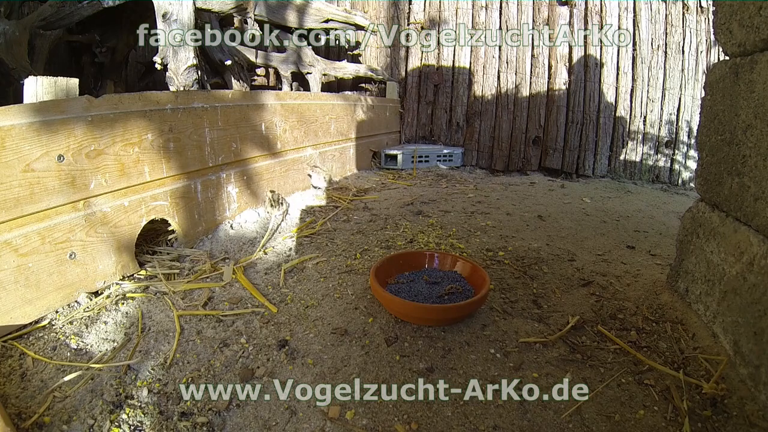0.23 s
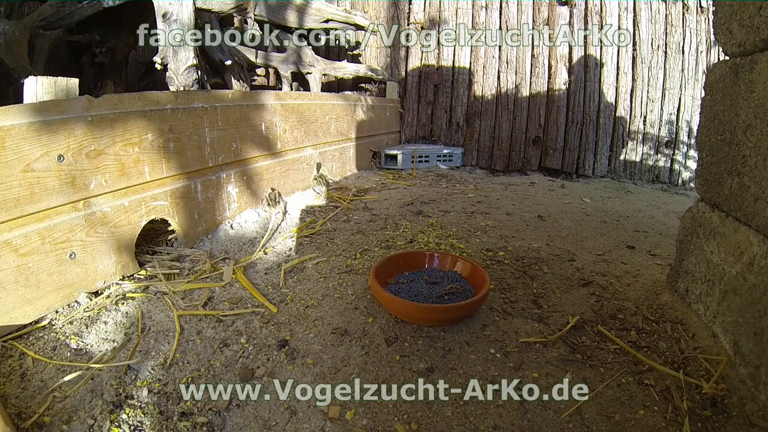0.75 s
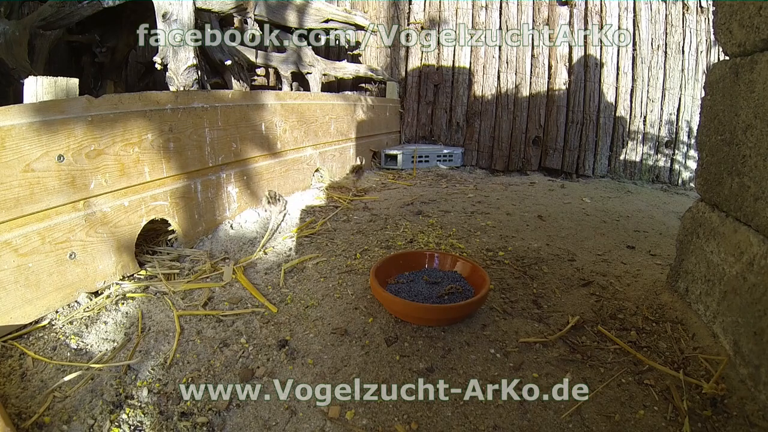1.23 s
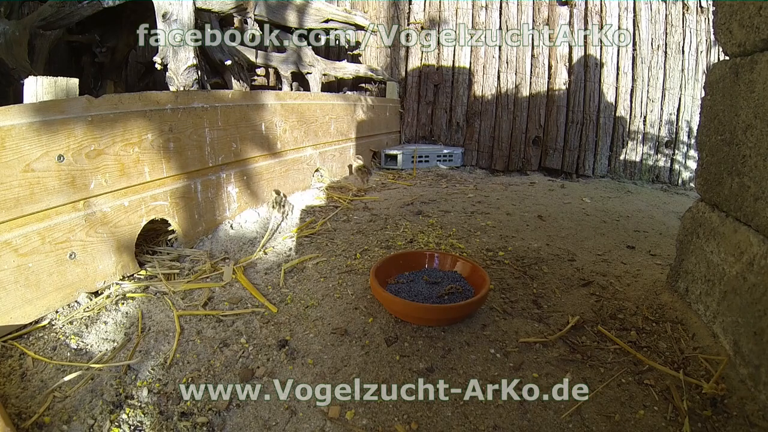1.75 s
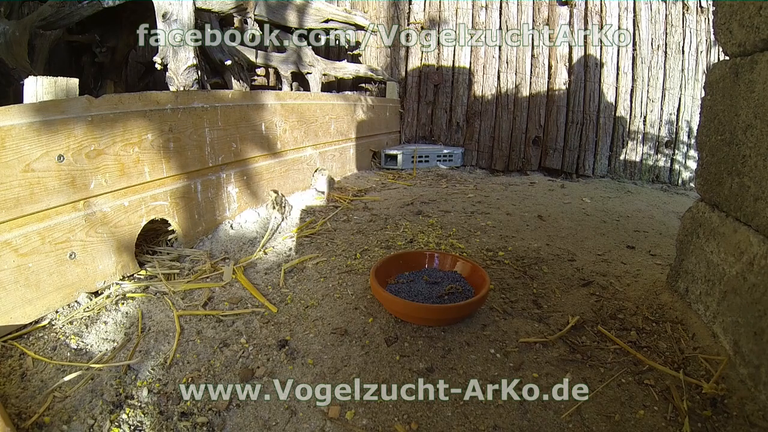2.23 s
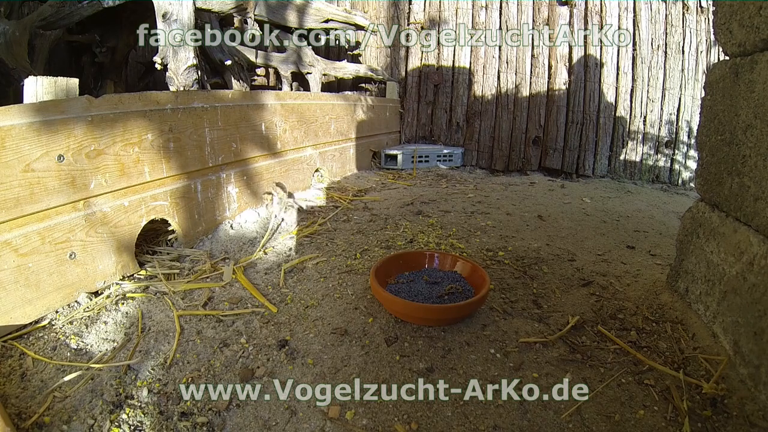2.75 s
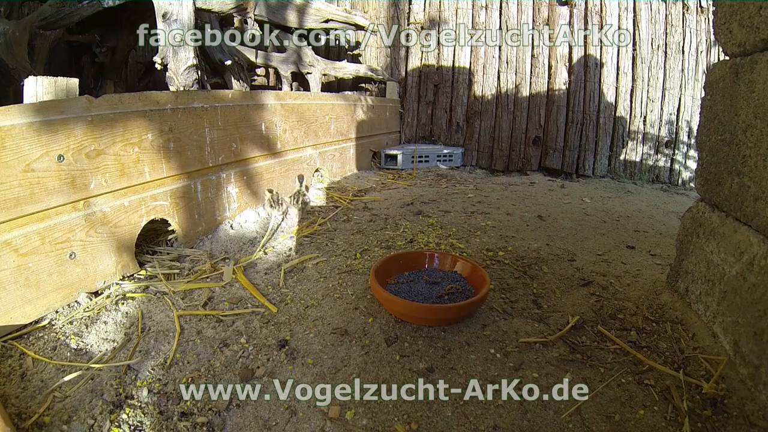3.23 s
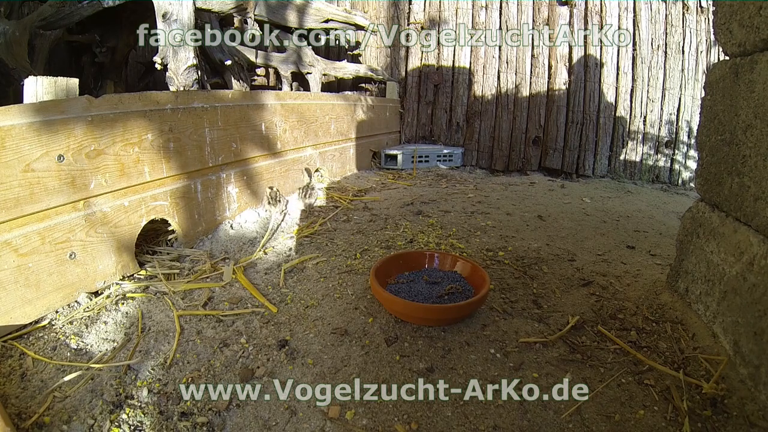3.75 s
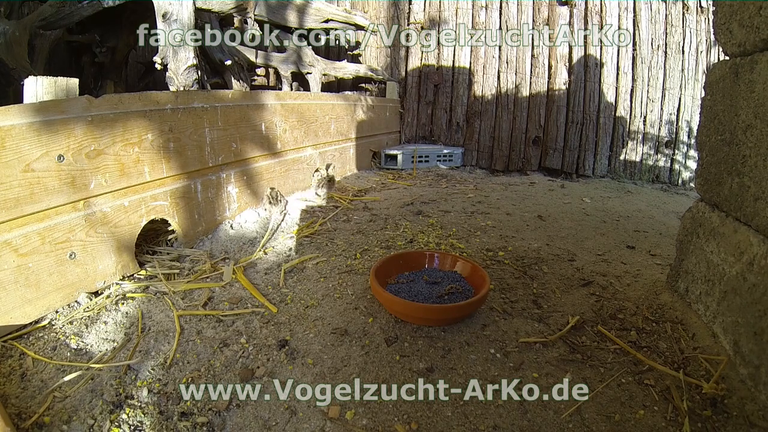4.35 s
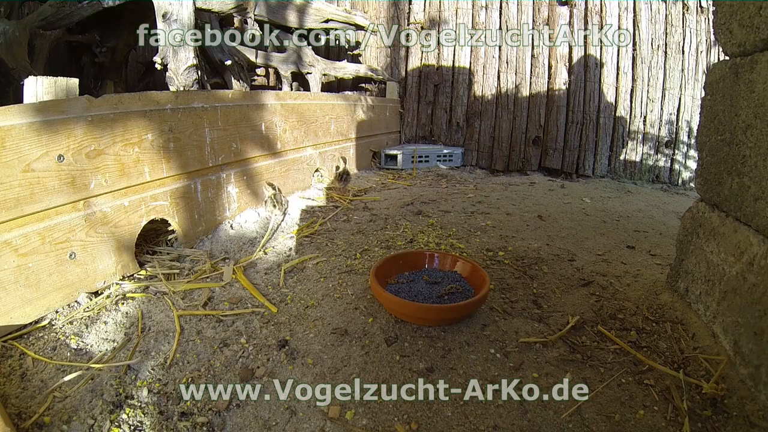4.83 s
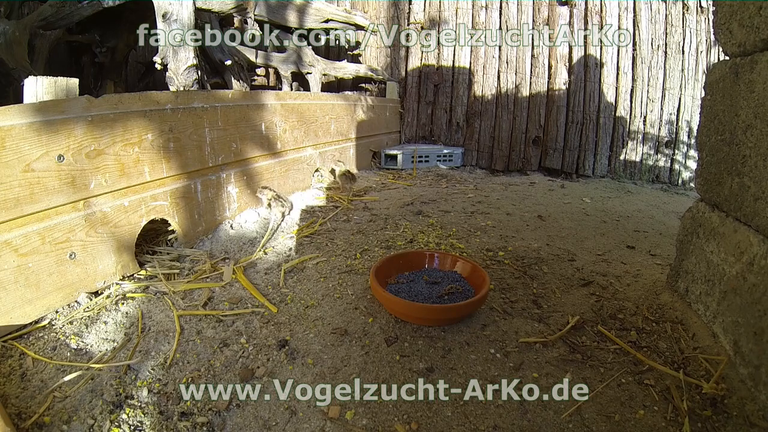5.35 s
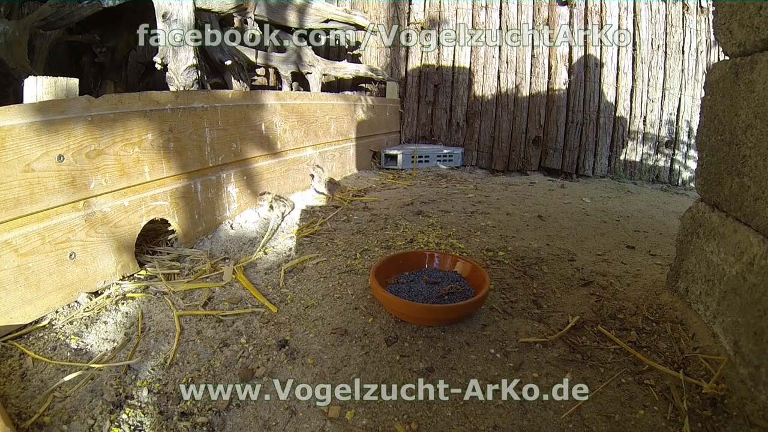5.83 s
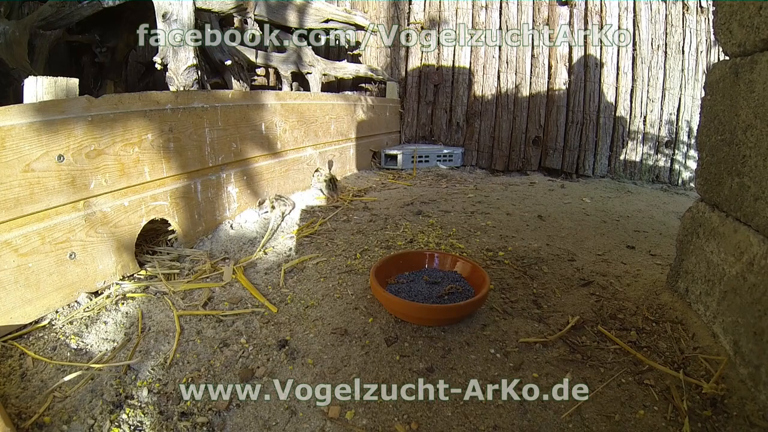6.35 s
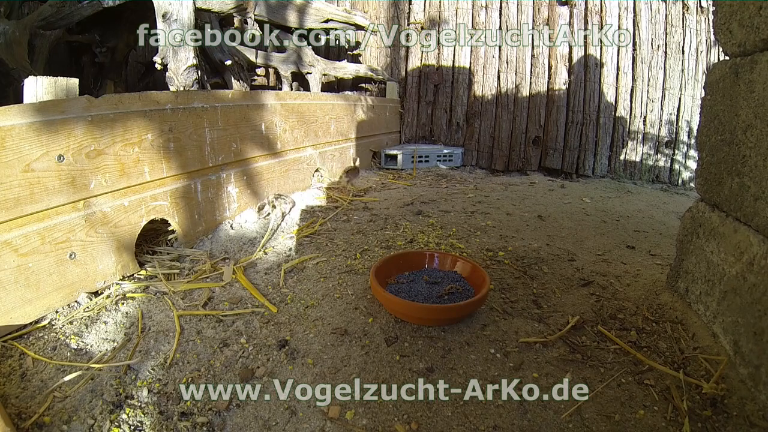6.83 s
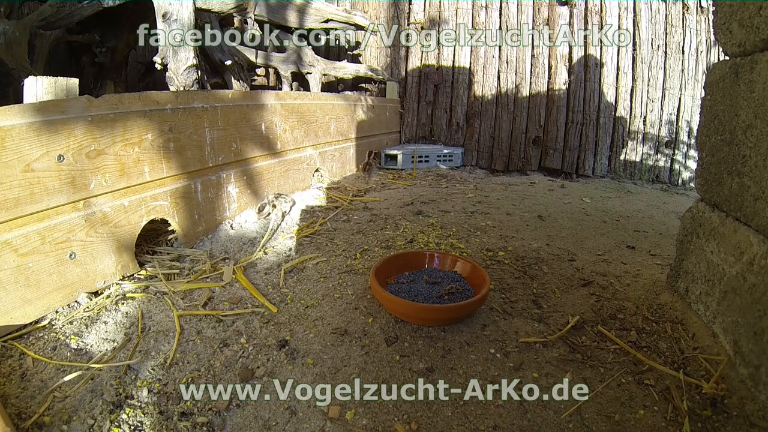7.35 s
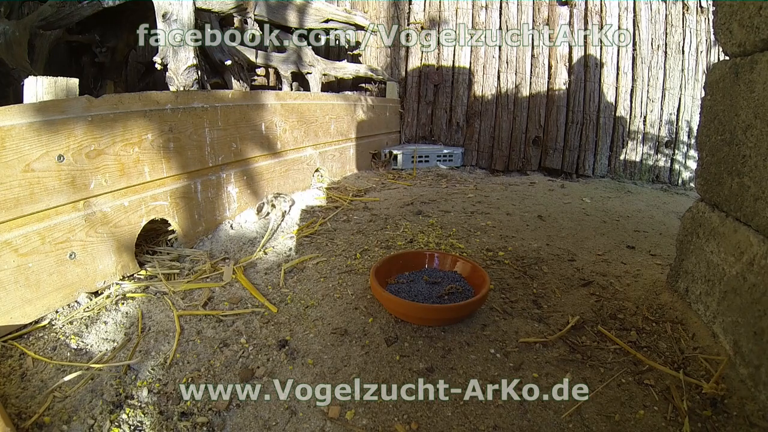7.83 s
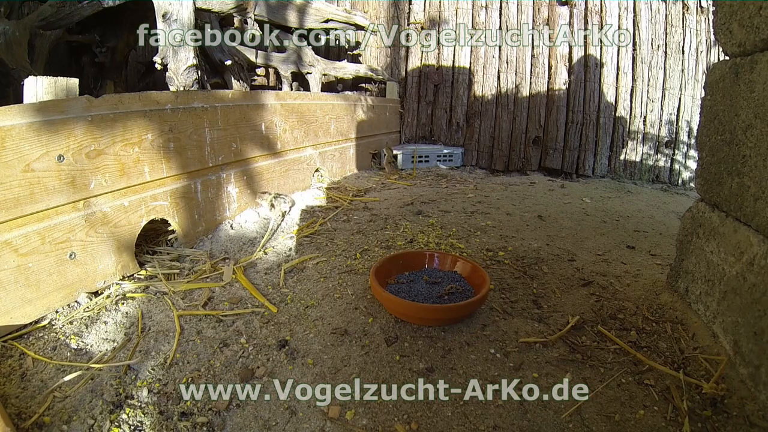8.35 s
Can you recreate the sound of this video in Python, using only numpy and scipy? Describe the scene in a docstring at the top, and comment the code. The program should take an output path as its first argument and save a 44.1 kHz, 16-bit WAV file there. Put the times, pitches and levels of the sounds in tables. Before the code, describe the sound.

Quail call in an outdoor wooden pen. Faint thin whistles and peeps come first, then one loud call that sweeps up, dips and flicks up again. A quick run of chirrups leads into two more sharp calls, followed by a brief soft whine from a larger fowl and faint scratches in straw. The nearby boards add short echoes, while a low rumble and a far passing engine lie underneath.

```python
"""Quail in a wooden pen

Three loud calls sweep up, dip and flick up again among soft chirrups, peeps, thin whistles and yelps,
each an unsteady syrinx tone with overtones coloured by the beak. A larger fowl whines once, and the
boards answer these voices with short echoes. Two soft, breathy bird notes sit among scratches of feet
in the straw; a soft hiss comes twice, over a low outdoor rumble and a far passing engine."""
import sys
import numpy as np
from scipy import signal
from scipy.fft import rfft, irfft, next_fast_len
from scipy.io import wavfile
from scipy.ndimage import uniform_filter1d, map_coordinates

SR = 44100
rng = np.random.default_rng(int(sys.argv[2]) if len(sys.argv) > 2 else 0)


def generate_wav(sig):
    """Save sig (samples, or channels by samples) to the path in sys.argv[1] as 16-bit PCM at SR."""
    pcm = np.round(np.clip(np.atleast_2d(sig).T, -1, 1) * 32767).astype(np.int16)
    wavfile.write(sys.argv[1], SR, pcm)


N = 378819
TIME = np.arange(N) / SR

# low end of the outdoor bed: freq_hz, density_db
RUMBLE_SPECTRUM = [(11, -27.5), (18, 2), (27, 0.5), (38, 3.5), (46, -4), (59, -11.5), (96, -5.5), (145, -7),
                   (157, -11.5), (174, -17.5), (209, -11), (223, -14), (247, -23), (313, -19.5),
                   (400, -28.5), (520, -53.5), (880, -120)]
# open air: freq_hz, density_db
AIR_SPECTRUM = [(180, -26.5), (300, -0.5), (452, -8), (490, -7.5), (841, -10.5), (975, -7), (1170, -15.5),
                (1350, -14.5), (3120, -30), (4180, -30.5), (4850, -32), (5260, -33.5), (7420, -41),
                (13200, -39), (15000, -50)]
# narrow high hiss on top of the bed: freq_hz, density_db
SHEEN_SPECTRUM = [(9000, -40), (9700, -19), (10000, 11.5), (10300, -7.5), (11000, -39)]
# the engine's dull roar: freq_hz, density_db
ROAR_SPECTRUM = [(90, -23.5), (135, 1.5), (155, 1.5), (175, -13), (205, -15), (260, -32.5), (500, -71.5)]
# swells in the engine's drone: start_s, length_s, boost_db
DRONE_SWELLS = [(5.263, 0.99, 8), (6.499, 0.7963, 4)]
# soft stretches of hiss: start_s, length_s, level_db
HISSES = [(1.341, 0.41925, -58.5), (3.956, 0.337, -55.5)]
# their colour: freq_hz, density_db
HISS_SPECTRUM = [(500, -20), (1200, 2.5), (2200, -1.5), (4000, -6), (5100, -13), (5800, -20), (9000, -49)]
# their faint ring: centre_hz, width_hz, gain_db
HISS_MODES = [(3650, 120, 0), (4053.6, 88, 1.5), (4750, 150, -6), (5002.3, 120, 0)]
# straw scratches, and two soft, breathy bird notes near 3.2 kHz (at 7.104 and 7.133 s):
# start_s, length_s, level_db, centre_hz, width_ratio
SCRATCHES_AND_NOTES = [(5.578, 0.01898, -64, 3940, .34), (6.64, 0.024, -64, 7900, .83),
                       (6.715, .0058, -55, 12090, .77), (6.716, 0.013182, -54, 2003, 2.2725),
                       (6.98, .21, -69.5, 7900, 2), (7.104, .029, -57, 3150, .19),
                       (7.133, 0.041, -57, 3340, 0.21), (7.257, .016, -63.5, 4330, 0.782)]

# slaps off the boards: delay_s, gain_db
BOARD_ECHOES = [(.0031, -20.5), (.0074, -5), (0.012, -18), (.019, -10)]
# decay of the scatter in the pen: freq_hz, t60_s
PEN_DECAY = [(300, 0.28), (2000, 0.22), (2800, 0.15), (5000, 0.22), (12000, 0.13)]
# how the beak radiates overtones: freq_hz, gain_db
BEAK_EQ = [(1000, 1), (4200, 2), (5000, 1), (5500, -13.5), (6000, -12), (6600, -13.5), (7600, -12.5),
           (8400, -14.5), (9300, -19), (12000, -15), (15000, -20)]
# overtones of the whine and the yelps: harmonic, gain_db
FOWL_PARTIALS = [(2, -3.5), (3, -21.5), (4, -34)]
# overtones of whistles, peeps and chirrups: harmonic, gain_db
THIN_PARTIALS = [(2, -5), (3, -31)]
# overtones of the loud calls: harmonic, gain_db
QUAIL_PARTIALS = [(2, -2.5), (3, -13), (4, -19), (5, -24.5), (6, -29)]
# air rushing through the beak: freq_hz, density_db
RUSH_SPECTRUM = [(3000, -9.5), (5500, 8), (7000, -10.5), (9500, -5), (10800, 3.5), (11800, -4.5),
                 (12800, -2), (15000, -10.5)]

# contour of the fowl's whine: time_s, pitch_hz, contour_db
WHINE_CONTOUR = [(6.66, 495.7, -47), (6.714, 520.4, -45), (6.728, 366.5, -41), (6.75, 396, -40),
                 (6.788, 494, -45.5), (6.83, 568, -41), (6.838, 664, -47.5), (6.86, 664.8, -42),
                 (6.87, 796, -38), (6.89, 743, -46)]
# thin rising whistles: start_s, length_s, start_hz, top_hz, level_db, overtones_db, second_voice_db
WHISTLES = [(0, 0.38, 2714, 3140, -60, 17, -53.5), (4.131, 0.44, 2620, 3260, -60, 16, -64),
            (6.162, .42, 2700, 3280, -61, 15, -57), (7.911, .49, 2614, 3170, -59.5, 14.5, -55.5)]
# arched peeps: start_s, length_s, crest_hz, end_drop_ratio, level_db
PEEPS = [(0.084, 0.09, 4760, 0.11, -62), (3.902, 0.04587, 4150, 0.21, -63),
         (5.026, 0.069, 4126, 0.25, -52.5), (5.458, 0.053, 4760, 0.18, -60.5),
         (5.742, 0.0718, 5018, 0.067, -70), (5.858, 0.059, 4850, 0.24, -63),
         (6.014, .082, 4943, 0.0906, -67), (7.377, 0.052, 4802, .22, -64), (7.449, .067, 4311, .07, -61.5),
         (7.591, 0.09, 4452, .04, -56.5), (7.875, 0.057, 4870, 0.2, -66), (8.04, .047, 4576, .1, -65)]
# quick downward slurs: start_s, length_s, end_hz, level_db
SLURS = [(2.135, 0.039, 4424, -70), (2.384, 0.033, 4290, -54.5), (2.964, 0.03542, 3860, -61),
         (7.793, 0.013, 3150, -57), (8.417, 0.016, 3320, -49.5)]
# quick yelps: crest_s, level_db
YELPS = [(.862, -43), (4.911, -39.5)]
# runs of chirrups: first_crest_s, last_crest_s, first_hz, last_hz, level_db, dip_ratio
CHIRRUP_RUNS = [(0.375, 0.893, 4570, 4507, -53, .25), (4.072, 4.876, 4186, 4416, -44.5, .2)]
# the lead calls: start_s, attack_s, rise_s, hold_s, dip_s, start_hz, dip_hz, level_db,
# loss_db_per_oct (below the crest), overtones_db, high_overtones_db, flutter_hz, flutter_db,
# beak_ring_hz, beak_ring_db, rush_db
LOUD_CALLS = [(2.583, 0.025, .11, 0.059, 0.084463, 1352, 2259, -21, 19.5, -18.5, 1, 66.14, 4.5, 14300, -2, -43),
              (5.079, 0.0083, .138, .006, 0.078, 1518, 1865, -27.5, 11, -12.5, -9.5, 124.3, 2.5, 10760, 3.5, -25),
              (6.309, 0.057, .15, .022, .078, 1377, 2078, -27.5, 11.5, -12.5, -1, 106.2, 2.5, 12500, -2, -37)]

CREST_HZ, CREEP_OCT = 2896, .18  # a loud call's top pitch; the slow last part of its climb
DIP_SQUARENESS, STUTTER_HZ, STUTTER_OCT = 2.1, 55.07, .096  # the dip's flat bottom and its stutter
FLICK_S, FLICK_OCT, RELEASE_S = .012, .06, .012  # closing flick: length, drop below the crest, fade
RICHER_DB_PER_OCT = 15.5  # overtones grow below the crest
THROAT_HZ, THROAT_WIDTH_HZ, THROAT_DB = 3447.6, 130, 6.5  # they flare as the octave crosses this mode


def amp(db):
    """Decibels to gain."""
    return 10 ** (np.asarray(db) / 20)


def unit(x):
    """Scale to rms 1."""
    return x / np.sqrt(np.mean(x ** 2) + 1e-20)


def along(points, hz):
    """Read (freq_hz, value) points on a log frequency axis."""
    freqs, values = np.transpose(points)
    return np.interp(np.log(hz + 1), np.log(freqs + 1), values)


def curves(rows):
    """One value per sample for each column, from the first row's time to the last."""
    times, *columns = np.transpose(rows)
    return [np.interp(np.arange(times[0], times[-1], 1 / SR), times, column) for column in columns]


def wobble(rate, size):
    """A smooth random curve, rate knots a second."""
    knots = rng.standard_normal(int(size * rate / SR) + 4)
    return map_coordinates(knots, [np.arange(size) * rate / SR])


def ease(u):
    """A smooth step from 0 to 1 as u goes from 0 to 1."""
    return np.sin(np.pi / 2 * np.clip(u, 0, 1)) ** 2


def fade(size, edge_s):
    """A gate that opens and closes softly."""
    t = np.arange(size) / SR
    return ease(np.minimum(t, t[-1] - t) / edge_s)


def filtered(x, response):
    """Shape x with a frequency response."""
    padded = next_fast_len(len(x) + 8192)
    return irfft(rfft(x, padded) * response(np.fft.rfftfreq(padded, 1 / SR)), padded)[:len(x)]


def resonance(f, hz, width_hz):
    """Causal response of one mode, 1 at its peak."""
    return 1j * f * width_hz / (hz * hz - f * f + 1j * f * width_hz)


def noise(spectrum, size):
    """Coloured noise of rms 1."""
    return unit(filtered(rng.standard_normal(size), lambda hz: amp(along(spectrum, hz))))


def add(track, start_s, sound):
    """Mix a sound into the track."""
    start = max(round(start_s * SR), 0)
    track[start:start + len(sound)] += sound[:N - start]


def outdoors():
    """The bed: low rumble, even air and a narrow high hiss."""
    rumble = amp(-35.5 + .23 * wobble(6.7, N)) * noise(RUMBLE_SPECTRUM, N)
    air = amp(-52 + .057 * wobble(5.8, N)) * noise(AIR_SPECTRUM, N)
    sheen = amp(-82.5) * noise(SHEEN_SPECTRUM, N)
    return rumble + air + sheen


def engine(pitch_hz=87.873, doppler_hz=20, nearest_s=4.9, pass_s=2.6, roar_peak_s=3.98, roar_width_s=1.2):
    """A far engine passes: Doppler shift sinks its drone, and its dull roar comes and goes."""
    away = (TIME - nearest_s) / pass_s
    hz = (pitch_hz - doppler_hz * np.tanh(away)) * (1 + .0199 * wobble(14, N))
    swell_db = sum(db * ease(np.minimum(TIME - start_s, start_s + length_s - TIME) / .12)
                   for start_s, length_s, db in DRONE_SWELLS)
    drone_db = -42 - 3 * away ** 2 + swell_db + 1.44 * wobble(15, N)
    drone = np.sqrt(2) * amp(drone_db) * np.sin(2 * np.pi * np.cumsum(hz) / SR)
    roar = amp(-42.5) / np.hypot(1, (TIME - roar_peak_s) / roar_width_s) * noise(ROAR_SPECTRUM, N)
    return drone + roar


def hiss():
    """Two soft stretches of hiss with a faint ring."""
    out = np.zeros(N)
    ring = lambda f: 1 + sum(amp(db) * resonance(f, hz, width_hz) for hz, width_hz, db in HISS_MODES)
    for start_s, length_s, level_db in HISSES:
        size = int(length_s * SR)
        ringing = filtered(noise(HISS_SPECTRUM, size), ring)
        add(out, start_s, amp(level_db) * unit(ringing) * fade(size, edge_s=.01748))
    return out


def straw_and_breathy_notes():
    """Gritty band-passed noise: wide bands are straw scratches, the two narrowest are soft bird notes."""
    out = np.zeros(N)
    for start_s, length_s, level_db, hz, width_ratio in SCRATCHES_AND_NOTES:
        size = int(length_s * SR)
        grit = rng.standard_normal(size) * amp(5.3 * wobble(900, size))
        grit = filtered(grit, lambda f: resonance(f, hz, hz * width_ratio) ** 2)
        add(out, start_s, amp(level_db) * unit(grit) * fade(size, edge_s=.0019))
    return out


def pen(x, boards_db, scatter_db, yard_db, yard_t60_s=.7109):
    """Direct sound, slaps off the boards, their dense scatter and a faint longer tail from the yard."""
    hz, t, bands = signal.stft(rng.standard_normal(SR), SR, nperseg=256)
    scatter = signal.istft(bands * amp(-60 * t / along(PEN_DECAY, hz)[:, None]), SR, nperseg=256)[1]
    scatter *= fade(len(scatter), edge_s=.0037)
    yard = rng.standard_normal(len(scatter)) * amp(-60 * np.arange(len(scatter)) / SR / yard_t60_s)
    response = amp(scatter_db) * scatter / np.linalg.norm(scatter)
    response += amp(yard_db) * yard / np.linalg.norm(yard)
    response[0] += 1
    for delay_s, db in BOARD_ECHOES:
        response[round(delay_s * SR)] += amp(db + boards_db)
    return signal.fftconvolve(x, response)[:N]


def beak_gain(hz):
    """How strongly the beak radiates each frequency."""
    return amp(along(BEAK_EQ, hz))


def syrinx(hz, level_db, overtones_db, partials, jitter, shimmer_db, rasp=0, beak=beak_gain):
    """A bird's unsteady tone, overtones coloured by the beak; rasp is cycle-to-cycle irregularity."""
    size = len(hz)
    unsteady_hz = hz * (1 + jitter * wobble(260, size))
    phase = 2 * np.pi * np.cumsum(unsteady_hz) / SR + rasp * wobble(1100, size)
    overtones = np.zeros(size)
    for harmonic, db in partials:
        k = round(harmonic)
        gain = amp(db + 1.2 * wobble(139, size)) * beak(k * hz) * (k * hz < SR / 2)
        overtones += gain * np.sin(k * phase)
    tone = np.sqrt(2) * (np.sin(phase) + amp(overtones_db) * overtones)
    return tone * amp(level_db + shimmer_db * wobble(157.34, size)) * fade(size, edge_s=.00099)


def fowl(pulse_hz=29.7, pulse_db=4, dark_below_hz=480, dark_db_per_oct=38, trim_db=-1):
    """A low pulsing whine that breaks downward, where it loses its overtones, then climbs in steps."""
    out = np.zeros(N)
    hz, contour_db = curves(WHINE_CONTOUR)
    pulse = np.cos(2 * np.pi * pulse_hz * np.arange(len(hz)) / SR)
    level_db = contour_db + trim_db - pulse_db * pulse
    bright_db = -3 - dark_db_per_oct * np.maximum(np.log2(dark_below_hz / hz), 0)
    whine = syrinx(hz, level_db, bright_db, FOWL_PARTIALS, jitter=.021, shimmer_db=2.5)
    add(out, WHINE_CONTOUR[0][0], whine)
    return out


def whistles(top_at=.8, loudest_at=.38, brightest_at=.59, second_at=.6, second_hz=5000):
    """Slow rising whistles: the octave takes over midway, and a nearly level voice joins late."""
    out = np.zeros(N)
    for start_s, length_s, start_hz, top_hz, db, overtones_db, second_db in WHISTLES:
        u = np.linspace(0, 1, int(length_s * SR))  # the _at settings are points on this 0-1 span
        hz = start_hz + (top_hz - start_hz) * ease(u / top_at)
        level_db = db - 42 * (u - loudest_at) ** 2
        bright_db = overtones_db - 115 * (u - brightest_at) ** 2
        whistle = syrinx(hz, level_db, bright_db, THIN_PARTIALS, jitter=.0088, shimmer_db=4.5, rasp=.1283)
        add(out, start_s, whistle)
        ends = np.linspace(-1, 1, np.sum(u > second_at)) ** 2
        second = syrinx(second_hz * (1 - .016 * ends), second_db - 11 * ends, -9, THIN_PARTIALS,
                        jitter=.012, shimmer_db=.5)
        add(out, start_s + second_at * length_s, second)
    return out


def contact_note(hz, db, soft_ends_db=5.5):
    """One thin note, loudest in the middle."""
    level_db = db - soft_ends_db * np.linspace(-1, 1, len(hz)) ** 2
    return syrinx(hz, level_db, -13, THIN_PARTIALS, jitter=.0058, shimmer_db=3.5)


def peeps(slur_top_hz=5030):
    """Scattered contact notes: little arches, and slurs that fall ever faster."""
    out = np.zeros(N)
    for start_s, length_s, crest_hz, drop, db in PEEPS:
        ends = np.linspace(-1, 1, int(length_s * SR)) ** 2
        add(out, start_s, contact_note(crest_hz * (1 - drop * ends), db))
    for start_s, length_s, end_hz, db in SLURS:
        fall = np.linspace(0, 1, int(length_s * SR)) ** 2
        add(out, start_s, contact_note(slur_top_hz + (end_hz - slur_top_hz) * fall, db))
    return out


def yelps(path_hz=(1716, 2950, 704), rise_s=.013, fall_s=.019, crack_db=15):
    """Rough yelps that shoot up, nearly lose their voice at the crest, and plunge."""
    out = np.zeros(N)
    t = np.arange(-rise_s, fall_s, 1 / SR)
    hz = np.interp(t, (-rise_s, 0, fall_s), path_hz)
    for crest_s, db in YELPS:
        level_db = db - crack_db * (hz / hz.max()) ** 4
        yelp = syrinx(hz, level_db, -14, FOWL_PARTIALS, jitter=.05, shimmer_db=-4, rasp=.89)
        add(out, crest_s - rise_s, yelp)
    return out


def chirrups(gap_s=.133, half_arch_s=.021, second_arch_s=.036, fade_db_per_s=90,
             warm_up_db=8.5, warm_up_notes=1.36):
    """Evenly paced runs of double-arched notes, brightest at the first crest; each run starts soft."""
    out = np.zeros(N)
    t = np.arange(-half_arch_s, second_arch_s + .76 * half_arch_s, 1 / SR)
    second_arch = .65 + ((t - second_arch_s) / half_arch_s) ** 2  # crests lower than the first
    drop = np.minimum((t / half_arch_s) ** 2, second_arch)
    envelope_db = -2 * drop - fade_db_per_s * np.maximum(t, 0) - 5 * ease(-t / half_arch_s) ** 2
    for first_s, last_s, first_hz, last_hz, db, depth in CHIRRUP_RUNS:
        count = round((last_s - first_s) / gap_s) + 1
        for k, (crest_s, hz) in enumerate(np.linspace((first_s, first_hz), (last_s, last_hz), count)):
            level_db = db - warm_up_db * np.exp(-k / warm_up_notes) + envelope_db
            note = syrinx(hz * (1 - depth * drop), level_db, -8 - 9 * drop, THIN_PARTIALS,
                          jitter=.0048, shimmer_db=3.5, rasp=.029)
            add(out, crest_s - half_arch_s, note)
    return out


def call_pitch(t, rise_s, hold_s, dip_s, start_hz, dip_hz):
    """Octaves below the crest: a smooth climb, a creeping hold, a stuttering dip and a flick back up."""
    u = np.clip((t - rise_s - hold_s) / dip_s, 0, 1)
    sunk = np.tanh(DIP_SQUARENESS * np.sin(np.pi * u) ** 2) / np.tanh(DIP_SQUARENESS)
    stutter = STUTTER_OCT * np.sin(2 * np.pi * STUTTER_HZ * t + wobble(60, len(t)))
    climb = (np.log2(CREST_HZ / start_hz) - CREEP_OCT) * (1 - ease(t / rise_s))
    creep = CREEP_OCT * np.maximum(1 - t / (rise_s + hold_s), 0)
    return climb + creep + sunk * (np.log2(CREST_HZ / dip_hz) + stutter) + FLICK_OCT * u * (1 - sunk)


def quail_calls(crack_db=3, attack_db=26, release_db=11):
    """The lead voice flutters, cracks where the pitch jumps, and turns hoarse where it sags."""
    out = np.zeros(N)
    for (start_s, attack_s, rise_s, hold_s, dip_s, start_hz, dip_hz, db, loss_db_per_oct, overtones_db,
         high_db, flutter_hz, flutter_db, ring_hz, ring_db, rush_db) in LOUD_CALLS:
        t = np.arange(int((rise_s + hold_s + dip_s + FLICK_S) * SR)) / SR
        below_oct = call_pitch(t, rise_s, hold_s, dip_s, start_hz, dip_hz)
        hz = CREST_HZ * 2 ** -below_oct
        sag = 1 - hz / np.maximum.accumulate(hz)
        flutter = np.sin(2 * np.pi * np.cumsum(flutter_hz * (1 + .193 * wobble(50, len(t)))) / SR)
        glide = np.gradient(np.log(hz)) * SR
        jump = uniform_filter1d(np.tanh((glide / 26) ** 4), size=90)  # near 1 when the pitch leaps

        edges_db = attack_db * (1 - ease(t / attack_s)) + release_db * (1 - ease((t[-1] - t) / RELEASE_S))
        level_db = db - loss_db_per_oct * below_oct - edges_db + flutter_db * flutter - crack_db * jump
        partials = [(k, gain_db + high_db * (k > 2)) for k, gain_db in QUAIL_PARTIALS]
        ringing_beak = lambda f: beak_gain(f) + amp(ring_db) * abs(resonance(f, ring_hz, 850)) ** 2
        flare_db = THROAT_DB / (1 + ((2 * hz - THROAT_HZ) / THROAT_WIDTH_HZ) ** 2)
        flicker_db = 1.5 * wobble(195.8, len(t))
        bright_db = overtones_db + flare_db + RICHER_DB_PER_OCT * below_oct + flicker_db
        voice = syrinx(hz * (1 + .0084 * flutter), level_db, bright_db, partials,
                       jitter=.012 + .05 * sag, shimmer_db=1.5, rasp=.1 + .5 * sag, beak=ringing_beak)

        hoarse = sag / sag.max()  # air hisses through only where the voice is hoarse
        rush = hoarse * amp(level_db + rush_db) * noise(RUSH_SPECTRUM, len(t)) * fade(len(t), edge_s=.01)
        add(out, start_s, voice + rush)
    return out


def scene():
    """Mono mix: three groups of voices, each with its own share of the pen, over the background."""
    lead = pen(quail_calls(), boards_db=-1.5, scatter_db=-6.5, yard_db=-30)
    chatter = chirrups() + peeps() + whistles() + yelps()
    flock = pen(chatter, boards_db=-5.5, scatter_db=-11.5, yard_db=-20.5)
    whine = pen(fowl(), boards_db=-14, scatter_db=-14, yard_db=-24)
    return (lead + flock + whine + straw_and_breathy_notes() + hiss() + engine() + outdoors())[None]


def record(dry, top_hz=15200):
    """A brick-wall high cut on the whole mix."""
    return filtered(dry[0], lambda hz: hz < top_hz)[None]


dry = scene()
out = record(dry)
generate_wav(out)
```